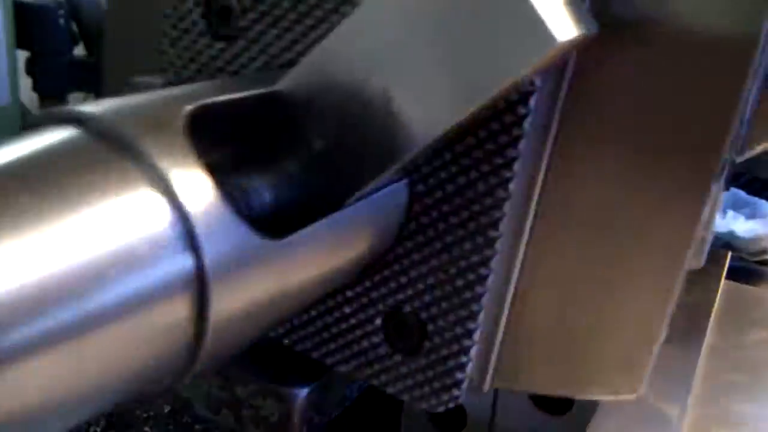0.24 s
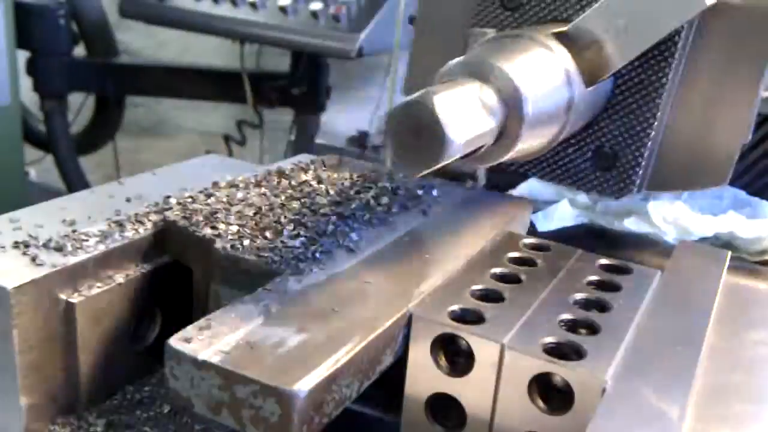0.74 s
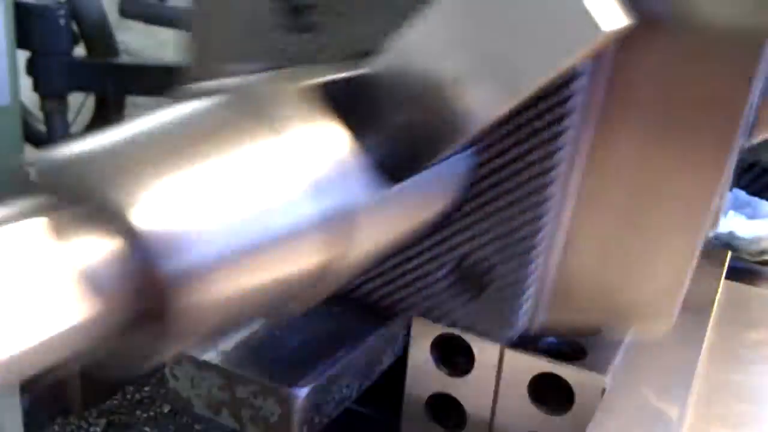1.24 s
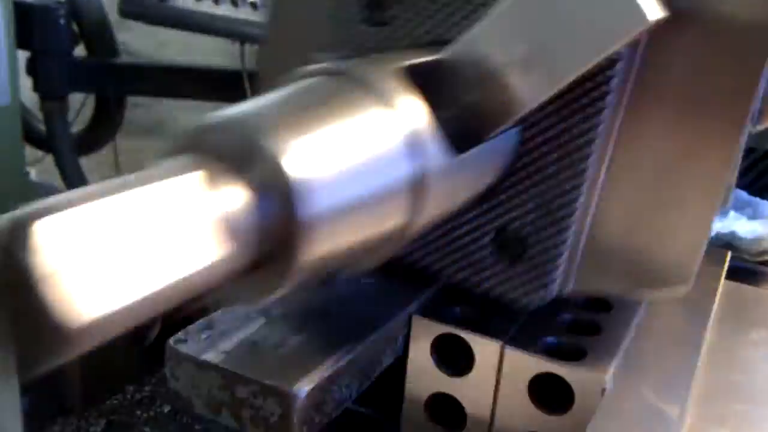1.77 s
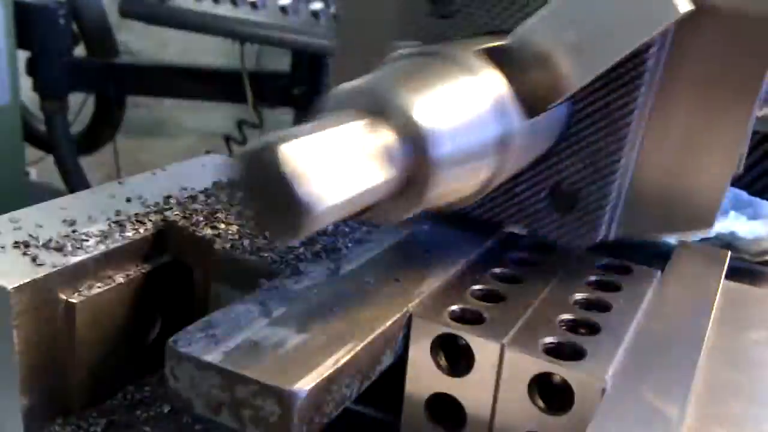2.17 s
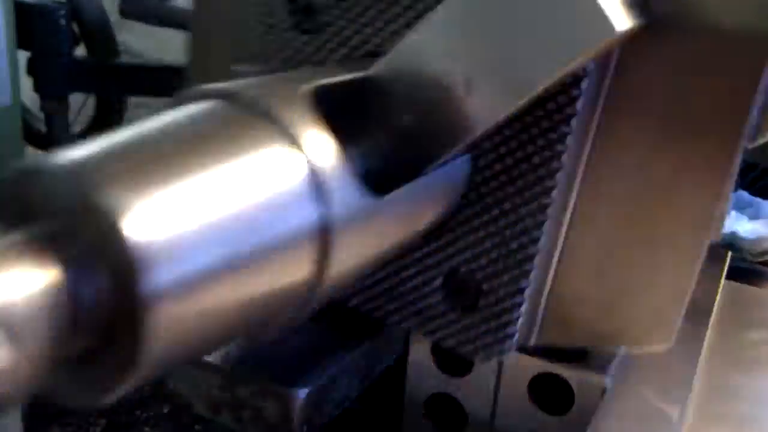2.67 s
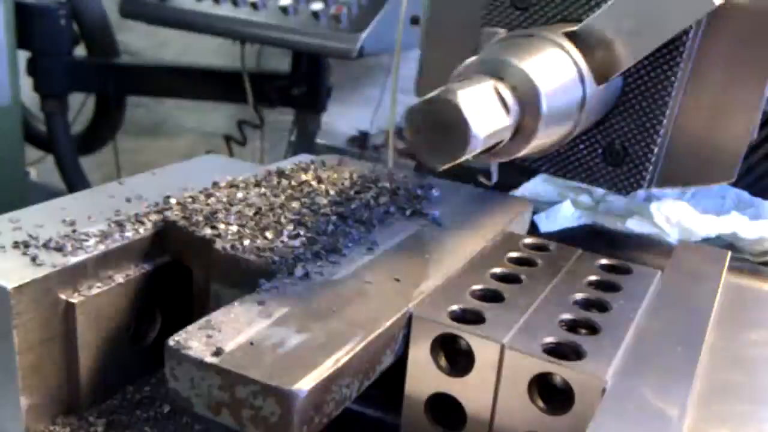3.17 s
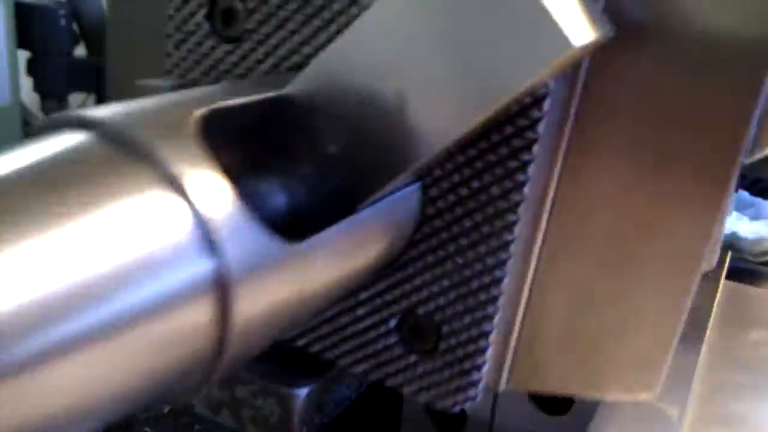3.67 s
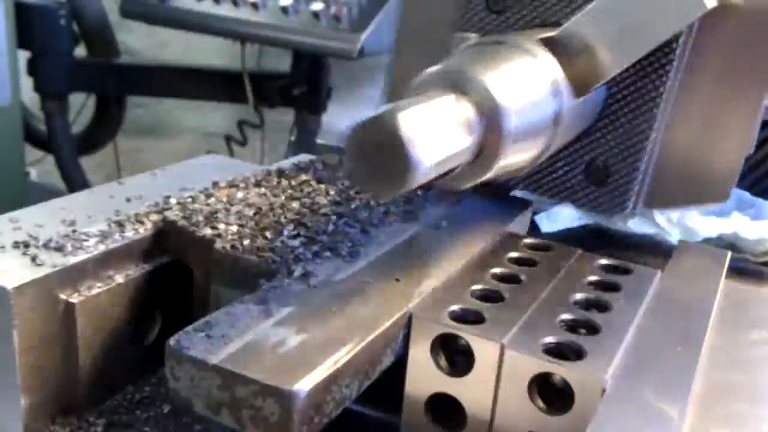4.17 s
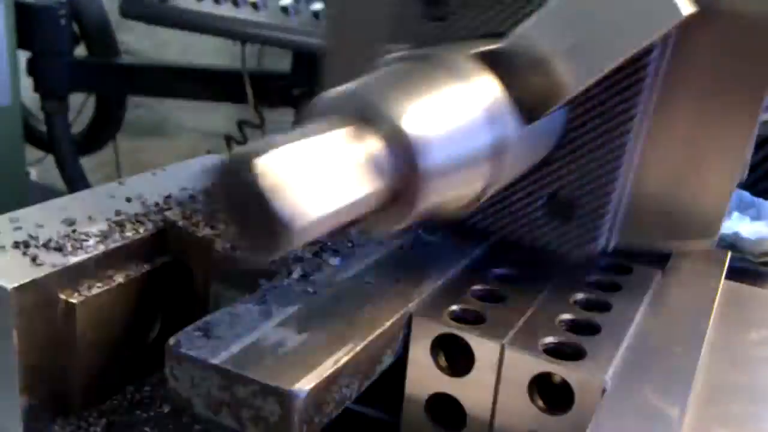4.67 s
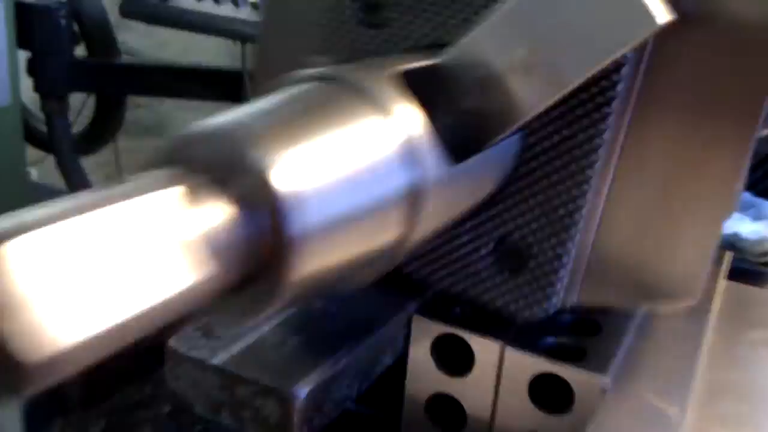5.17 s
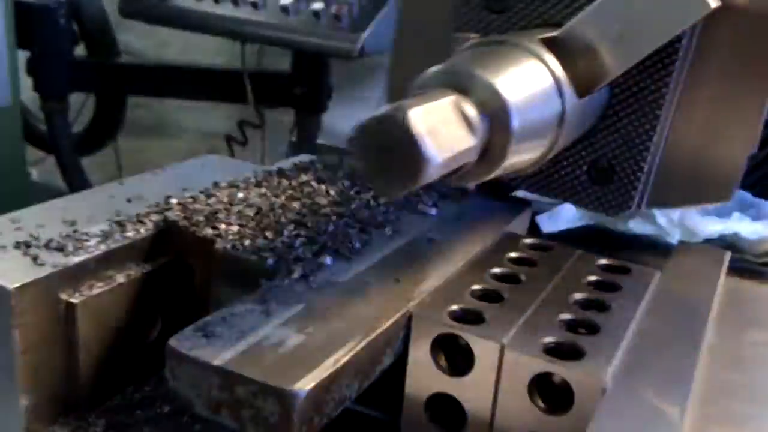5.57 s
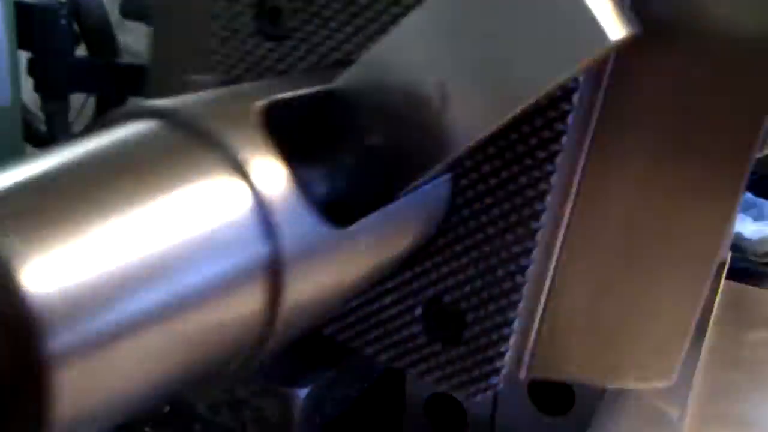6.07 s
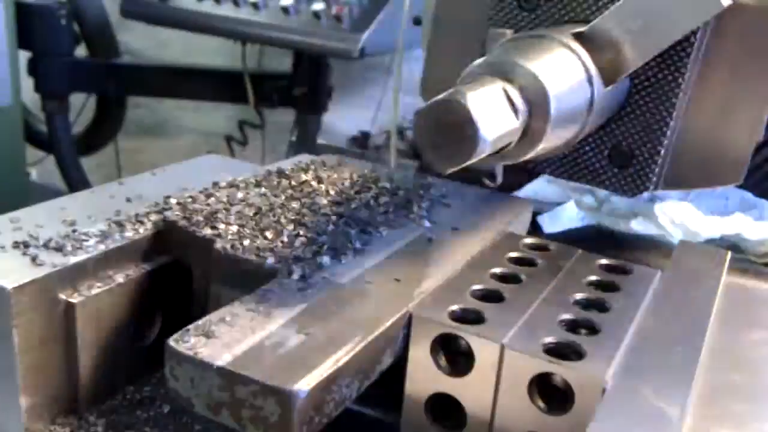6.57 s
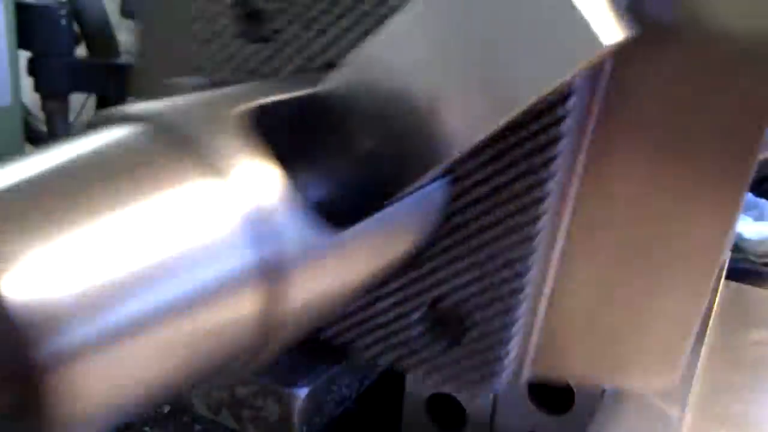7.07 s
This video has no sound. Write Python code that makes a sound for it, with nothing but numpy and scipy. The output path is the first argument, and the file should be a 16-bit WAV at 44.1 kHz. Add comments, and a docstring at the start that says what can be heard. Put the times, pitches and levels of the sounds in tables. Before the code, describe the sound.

Close, dry workshop machine: steady wavering gear whine and rattle, a low humming growl on each forward stroke, gritty rubbing and occasional sharp chip snaps.

```python
"""Metal shaper in a workshop

A metal shaper strokes back and forth, a little faster than once a second: its motor pinion whines and its gears rattle
in the iron casting. Each working stroke makes the ram hum and the gears grind; slideways rub and now and then squeal.
On every second stroke chips snap off as noise bursts, mostly after a hiss of the tool along the steel.
Tones are wavering sine waves, rattles are shaped noise. The level keeps ducking abruptly and creeping back."""
import sys
import numpy as np
from scipy.fft import rfft, irfft, next_fast_len
from scipy.io import wavfile
from scipy.ndimage import uniform_filter1d, map_coordinates

SR = 44100
rng = np.random.default_rng(int(sys.argv[2]) if len(sys.argv) > 2 else 0)


def persist_wave(psi):
    """Save psi, clipped to +-1, as 16-bit WAV."""
    counts = np.round(np.clip(psi, -1, 1) * 32767).astype(np.int16)
    wavfile.write(sys.argv[1], SR, np.atleast_2d(counts).T)


N = 322371

MOTOR_HZ, SHAFT_HZ = 29.578, 10.01  # turns per second of the motor shaft and the gear shaft
# Levels in the tables are relative: the functions add their own gains.


def amp(db):
    """Turn decibels into a gain."""
    return 10 ** (np.asarray(db) / 20)


def unit(x):
    """Scale x to an rms (average strength) of 1."""
    return x / np.sqrt(np.mean(x ** 2) + 1e-20)


def clock():
    """Give the time of each sample in seconds."""
    return np.arange(N) / SR


def wobble(rate):
    """Draw a smooth curve through random points, rate points a second."""
    points = rng.standard_normal(int(N * rate / SR) + 4)
    return map_coordinates(points, [np.arange(N) * rate / SR])


def noise():
    """Make fresh white noise."""
    return rng.standard_normal(N)


def filtered(x, response):
    """Multiply the spectrum of x by a response, a function of frequency in Hz."""
    m = next_fast_len(N + SR // 2)  # spare room for the filter to ring out
    hz = np.fft.rfftfreq(m, 1 / SR)
    return irfft(rfft(x, m) * response(hz), m)[:N]


def coloured(x, points):
    """Shape x by (frequency, level) points joined on a log frequency axis, at rms 1."""
    f, db = np.transpose(points)
    return unit(filtered(x, lambda hz: amp(np.interp(np.log(hz + 1), np.log(f), db))))


def resonated(x, modes):
    """Let x ring through a sum of (frequency, width, level) resonances, at rms 1."""
    def response(f):
        return sum(amp(db) * 1j * f * width / (centre ** 2 - f ** 2 + 1j * f * width)
                   for centre, width, db in modes)
    return unit(filtered(x, response))


def tone(hz, run, flutter, flutter_rate):
    """Make a sine of rms 1 on the running time, its strength and phase fluttering at random."""
    drift = 1 + flutter * (wobble(flutter_rate) + 1j * wobble(flutter_rate))
    spin = np.exp(2j * np.pi * (hz * run + rng.random()))
    return unit((drift * spin).real)


def tooth_rattle(run, repeat, throb):
    """Rattle gear teeth: their flaws return with every turn of the shaft, the rest is loose noise."""
    flaws = rng.standard_normal(round(SR / SHAFT_HZ))
    worn = map_coordinates(flaws, [run * SHAFT_HZ % 1 * len(flaws)], mode="grid-wrap")
    share = np.clip(repeat, 0, 1)
    rattle = np.sqrt(share) * worn + np.sqrt(1 - share) * noise()
    # the rattle pulses as each of the gear's 23 teeth engages
    mesh = np.cos(2 * np.pi * 23 * SHAFT_HZ * run)
    return rattle * (1 + throb * mesh)


def shaft_tones(hz, table, run, load_db):
    """Add up tones at whole multiples of a shaft's speed, each following its share of the load swing."""
    swing_db = load_db - np.mean(load_db)
    return sum(amp(db + follow * swing_db) * tone(round(k) * hz, run, flutter=0.52, flutter_rate=7)
               for k, db, follow in table)


# forward strokes of the ram; start and end are where the thrust is half built up or half gone:
# (start [s], length [s], gear load [dB], ram hum [dB], motor drone [dB], gear load on the return [dB],
#  slideway rub [dB])
STROKE_TABLE = [(0.037, 0.41, -20, -36.5, -33.5, -28, -31), (0.813, 0.46, -18.5, -32, -36, -23, -30),
                (1.65, 0.58, -21, -38.5, -32.5, -24.5, -30.5), (2.503, 0.42, -20, -32.5, -38.5, -28.5, -32),
                (3.306, 0.4, -23, -40, -33.5, -26.5, -31), (4.102, 0.29, -22, -32, -36, -22.5, -30.5),
                (4.8, 0.5, -22.5, -33.5, -32.5, -23, -29.5), (5.67, 0.45, -19, -30, -37, -21, -30.5),
                (6.47, 0.62, -22, -43, -32.5, -24.5, -30.5)]
ATTACK_S, RELEASE_S = 0.14, 0.31  # the thrust builds quickly and eases off slowly
HUM_REST_DB, DRONE_REST_DB = -49.5, -42.5  # while the ram runs back
LOAD_WAVER_DB, HUM_WAVER_DB, DRONE_WAVER_DB = 1.14, 2.5, 0.7  # no stroke is quite even
WAVER_RATE = 13  # random points a second
RUB_FOLLOWS = 0.35  # share of the load swing that the slideway rub follows


def stroke_levels():
    """Find the gear load, ram hum, motor drone and slideway rub in dB as the ram's thrust comes and goes."""
    t = clock()
    start, length, load_db, hum_db, drone_db, return_db, rub_db = np.transpose(STROKE_TABLE)
    end = start + length
    rise = np.clip((t - start[:, None]) / ATTACK_S + .5, 0, 1)
    fall = np.clip((end[:, None] - t) / RELEASE_S + .5, 0, 1)
    thrust = rise * fall  # one row per stroke
    at_rest = 1 - thrust.sum(axis=0)

    def driven(rest_db, full_db, waver_db):
        return rest_db * at_rest + full_db @ thrust + waver_db * wobble(WAVER_RATE)

    returning_db = np.interp(t, end + RELEASE_S / 2, return_db)
    load = driven(returning_db, load_db, LOAD_WAVER_DB)
    hum = driven(HUM_REST_DB, hum_db, HUM_WAVER_DB)
    drone = driven(DRONE_REST_DB, drone_db, DRONE_WAVER_DB)
    rub = np.interp(t, end, rub_db) + RUB_FOLLOWS * (load - np.mean(load))
    return load, hum, drone, rub


# the pinion's whine swells and fades: (time [s], level [dB])
WHINE_LEVELS = [(0, -30), (.15, -32), (.36, -18.5), (.62, -19), (.88, -15), (1.12, -34), (1.38, -18),
                (1.62, -19), (2.05, -22), (2.25, -24), (2.62, -32), (3.0, -17), (3.24, -18), (3.38, -27),
                (3.8, -16), (4.12, -22), (4.88, -23), (5.02, -16), (5.2, -22), (5.6, -21), (5.73, -30),
                (5.95, -23), (6.42, -20.5), (6.55, -26), (6.95, -29), (7.2, -16.5), (7.31, -22.5)]
PINION_TEETH = 64
WHINE_WAVER_DB = 1.3


def pinion(run):
    """Whine at the rate at which the motor pinion's teeth mesh, wavering and slightly rough."""
    s, db = np.transpose(WHINE_LEVELS)
    level_db = np.interp(clock(), s, db) + WHINE_WAVER_DB * wobble(14)
    return amp(level_db) * tone(PINION_TEETH * MOTOR_HZ, run, flutter=0.056, flutter_rate=45)


def motor_drone(run, drone_db):
    """Drone low at 14 times the motor shaft's speed, swelling with the strokes."""
    return amp(drone_db + 1.5) * tone(14 * MOTOR_HZ, run, flutter=0.57, flutter_rate=6.7)


RING_DB, RING_FOLLOWS = -34, 0.29  # base level, and the share of the load swing that it follows


def gear_ring(run, load_db):
    """Ring at 107 times the gear shaft's speed, beating with a wheel that rings a few hertz above."""
    ring_db = RING_DB + RING_FOLLOWS * (load_db - np.mean(load_db))
    shaft = tone(107 * SHAFT_HZ, run, flutter=.12, flutter_rate=10)
    wheel = tone(1075, run, flutter=.12, flutter_rate=10)
    return amp(ring_db + 2.5) * unit(shaft + .55 * wheel)


# tones of the motor shaft: (multiple of its speed, level [dB], share of the load swing followed [0-1])
MOTOR_TONES = [(12, -45, 1), (13, -46, .8), (48, -45, .3), (52, -38.5, .3), (58, -42.5, .2), (60, -35, .1),
               (66, -40, .1)]


def motor_tones(run, load_db):
    """Sound the multiples of the motor shaft's speed, the low ones swelling most with the load."""
    return amp(-1.5) * shaft_tones(MOTOR_HZ, MOTOR_TONES, run, load_db)


# tones of the gear shaft: (multiple of its speed, level [dB], share of the load swing followed [0-1])
GEAR_TONES = [(25, -51, 0), (36, -48, .9), (57, -45, .6), (58, -44, .6), (60, -45, .6), (77, -35.5, .9),
              (87, -38, .9), (100, -36, .6), (101, -39, .6), (109, -40, .5), (124, -46, .3), (151, -45, .3),
              (164, -44, .3), (166, -41.5, .3), (175, -34, .2), (176, -36.5, .2), (178, -36, .1),
              (180, -42, .3), (184, -38, .4), (185, -37, .6), (187, -34, .7), (194, -44, .1)]


def gear_tones(run, load_db):
    """Sound the multiples of the gear shaft's speed, most of them swelling with the load."""
    return amp(0.5) * shaft_tones(SHAFT_HZ, GEAR_TONES, run, load_db)


# thin ringing of the gear wheels: (frequency [Hz], level [dB])
WHEEL_TONES = [(2357.5, -48), (2762, -52), (2917.7, -43.5), (2995, -43.5), (3022, -48), (3116, -48),
               (4861, -55), (5495, -53), (5830, -54), (6850, -52), (8310, -60), (8510, -59), (8760, -60)]


def wheel_ringing(run):
    """Ring the gear wheels as thin, strongly fluttering tones."""
    return sum(amp(db) * tone(hz, run, flutter=0.89, flutter_rate=14) for hz, db in WHEEL_TONES)


# gear noise through the casting: (frequency [Hz], level per hertz [dB])
CASTING_COLOUR = [(20, -42), (42, -33), (130, -25.5), (250, -12), (305, -14), (350, -6), (470, -2),
                  (600, -1), (700, -4), (810, 1), (930, 1), (1080, 4), (1220, -9.5), (1420, -9),
                  (2200, -13.5), (5000, -42)]


def casting_grind(run, load_db):
    """Grind as loaded teeth shake the iron casting, which colours their rattle."""
    return amp(load_db - 4.0) * coloured(tooth_rattle(run, repeat=0.35, throb=0.43), CASTING_COLOUR)


# resonances of the gear housing: (frequency [Hz], width [Hz], level [dB])
HOUSING_MODES = [(1540, 43, -2.5), (1652, 63, -1), (1793, 100, 1), (1877.5, 23, 8.5), (1940, 23, -16),
                 (2080, 30, -9), (2580, 320, -18.5), (3027, 39, -3.5)]


def housing_ring(run, rub_db):
    """Ring the thinner gear housing with tooth rattle all through the cycle."""
    return amp(rub_db + 5) * resonated(tooth_rattle(run, repeat=0.44, throb=0.084), HOUSING_MODES)


# resonances of the ram under thrust: (frequency [Hz], width [Hz], level [dB])
RAM_RESONANCES = [(354, 27, -11.5), (896, 89, 4), (1022, 16, -4.5)]


def ram(run, hum_db):
    """Hum and growl in the ram's resonances as it is pushed forward."""
    hum = amp(hum_db - 2.2) * tone(187, run, flutter=0.076, flutter_rate=11)
    judder = noise() * amp(1.9 * wobble(160))
    # the growl swells a little less than the hum
    growl = amp(0.9 * hum_db + 2.5) * resonated(judder, RAM_RESONANCES)
    return hum + growl


# the ram rubbing in its slideways: (frequency [Hz], level per hertz [dB])
SLIDEWAY_COLOUR = [(1200, -5), (2600, 4), (3450, -4.5), (4050, 1), (4450, -5), (5100, -1.5), (5500, 6),
                   (6200, -0.5), (7100, 7), (8100, -4), (10300, -7.5), (10900, -12.5), (14400, -15.5),
                   (15400, -23)]


def slideway_rub(run, rub_db):
    """Rub the ram grittily in its slideways both ways: tooth rattle roughened by a fast wobble."""
    grit = tooth_rattle(run, repeat=0.15, throb=0.023) * amp(1.0 * wobble(1500))
    return amp(rub_db + 2.5) * coloured(grit, SLIDEWAY_COLOUR)


# the tool sliding over the steel: (start [s], end [s], level reached towards the end [dB])
SCRAPE_TIMES = [(-.15, 0.095, -39), (1.524, 1.788, -35.5), (4.67, 4.953, -36), (6.365, 6.63, -37)]
# colour of its hiss: (frequency [Hz], level per hertz [dB])
HISS_COLOUR = [(9000, -11), (12000, -12), (12850, 0), (13400, -7), (14500, -12), (16000, -25)]


def tool_hiss():
    """Slide the tool's edge along the steel with a thin hiss that grows, then stops."""
    t = clock()
    slide = 0
    for start, end, db in SCRAPE_TIMES:
        growth = np.clip((t - start) / (end - start), 0, 1) ** 0.38
        stop = np.clip((end - t) / .02 + .5, 0, 1)
        slide = slide + amp(db) * growth * stop
    return slide * coloured(noise(), HISS_COLOUR)


# chips snapping off: (time [s], level [dB], time to fade by 60 dB [s])
CHIP_TIMES = [(0.087, -23.5, 0.063), (0.2015, -22, 0.043), (0.4182, -22.5, 0.022), (1.7648, -26, 0.065),
              (2.1006, -33, 0.065), (2.257, -25, 0.05), (3.386, -21, 0.12), (3.492, -23, .08),
              (3.6022, -27, 0.1), (4.956, -19.5, 0.11), (5.072, -24, 0.06), (6.6387, -20, 0.046),
              (6.751, -18.5, 0.047), (6.857, -21.5, 0.067), (6.968, -28, .12)]
# colour of their crackle: (frequency [Hz], level per hertz [dB])
CRACKLE_COLOUR = [(2000, -7), (5000, 1), (7400, 9.5), (9500, -1.5), (12000, -1), (13700, -4), (15500, -22)]


def chip_snaps():
    """Crack chips away in short crackles: rough noise that starts at once and dies quickly."""
    t = clock()
    snaps = sum(amp(db - 60 * np.abs(t - s) / t60) * (t >= s) for s, db, t60 in CHIP_TIMES)
    crackle = coloured(noise() * amp(3.0 * wobble(700)), CRACKLE_COLOUR)
    return amp(1.8) * snaps * crackle


# faint squeals of the slideways: (start [s], end [s], frequency [Hz], level [dB])
SQUEAL_TIMES = [(.9, 1.25, 4140, -37), (2.9, 3.35, 3840, -45), (3.445, 4.11, 2380, -39),
                (4.533, 4.88, 2358, -39), (5.704, 6.052, 4050, -38)]


def squeals():
    """Let a slideway sing now and then, a fluttering tone that swells and fades."""
    t = clock()
    total = 0
    for start, end, hz, db in SQUEAL_TIMES:
        arch = np.sin(np.pi * np.clip((t - start) / (end - start), 0, 1))
        total = total + amp(db) * arch * tone(hz, t, flutter=1.0, flutter_rate=49)
    return total


def scene():
    """Run everything from one motor, so the machine's tones share its slight drift of speed."""
    load_db, hum_db, drone_db, rub_db = stroke_levels()
    run = np.cumsum(1 + 0.000595 * wobble(5)) / SR  # the machine's own running time
    machine = pinion(run) + motor_drone(run, drone_db) + gear_ring(run, load_db)
    machine += motor_tones(run, load_db) + gear_tones(run, load_db) + wheel_ringing(run)
    machine += casting_grind(run, load_db) + housing_ring(run, rub_db)
    machine += ram(run, hum_db) + slideway_rub(run, rub_db)
    machine += tool_hiss() + chip_snaps() + squeals()
    return np.array([machine, machine])  # the same in both channels


def whistle():
    """Add a faint, very high line-scan whistle."""
    return amp(-49) * tone(15622, clock(), flutter=.3, flutter_rate=40)


# the level dips abruptly and creeps back: (time [s], depth [dB])
DUCK_TIMES = [(.126, 5), (.433, 4.5), (0.905, 6), (1.285, 3.5), (1.431, 6.5), (1.647, 6), (1.804, 5),
              (2.267, 4), (2.612, 5), (2.819, 4.5), (3.403, 2.5), (3.655, 5), (3.81, 6), (4.582, 3),
              (4.814, 5.5), (5.039, 5.5), (5.18, 5.5), (5.583, 5.5), (5.796, 6.5), (6.001, 5), (6.216, 4),
              (6.992, 2.5), (7.1, 5)]


def ducking(fall, recovery):
    """Make a gain that drops within fall seconds and creeps back with time constant recovery [s]."""
    t = clock()
    dip_db = 0
    for s, db in DUCK_TIMES:
        drop = np.clip((t - s) / fall + .5, 0, 1)
        dip_db = dip_db + db * drop * np.exp(-np.maximum(t - s, 0) / recovery)
    return amp(-dip_db)


LIMIT_DB, RECOVER_DB_PER_S = -7, 37  # ceiling of the limiter and its recovery


def limited(x):
    """Pull the gain down at once for each peak over the ceiling, then recover at a steady rate."""
    fall_db = RECOVER_DB_PER_S * clock()
    peak_db = 20 * np.log10(np.abs(x) + 1e-9)
    held_db = np.maximum.accumulate(peak_db + fall_db) - fall_db
    excess_db = np.maximum(held_db - LIMIT_DB, 0)
    return x * amp(-uniform_filter1d(excess_db, size=32))


def record(dry):
    """Add the whistle, duck the level, limit the peaks and cut the deep bass and extreme treble."""
    x = (amp(0.15) * dry + whistle()) * ducking(fall=0.0035, recovery=0.086)

    def passband(hz):
        return hz ** 4 / (hz ** 4 + 32 ** 4) * (hz < 15800)

    return np.array([filtered(limited(channel), passband) for channel in x])


dry = scene()
out = record(dry)
persist_wave(out)
```